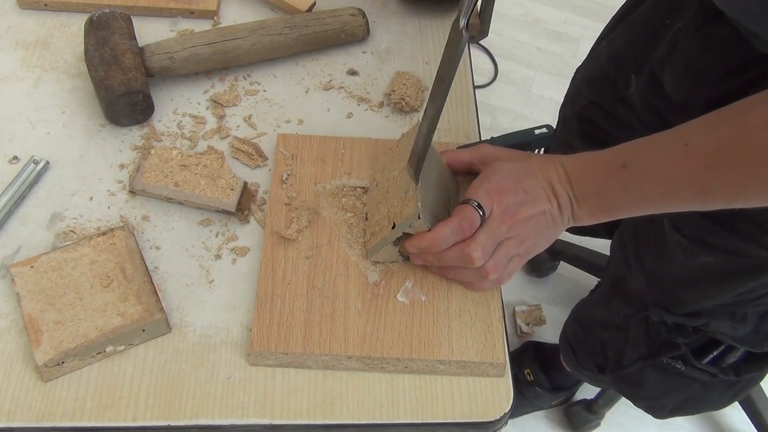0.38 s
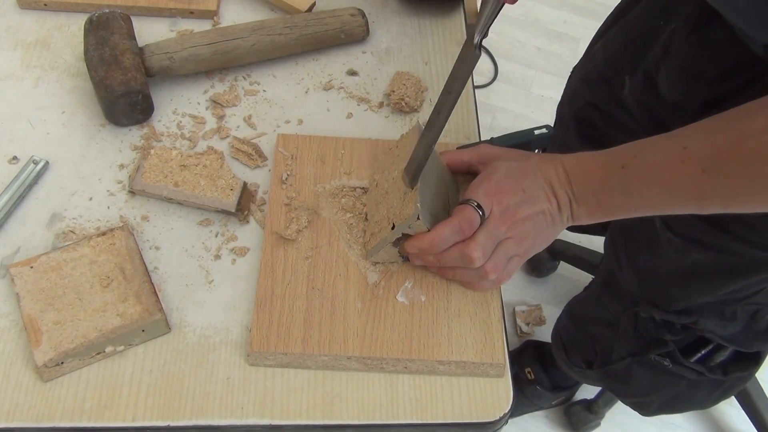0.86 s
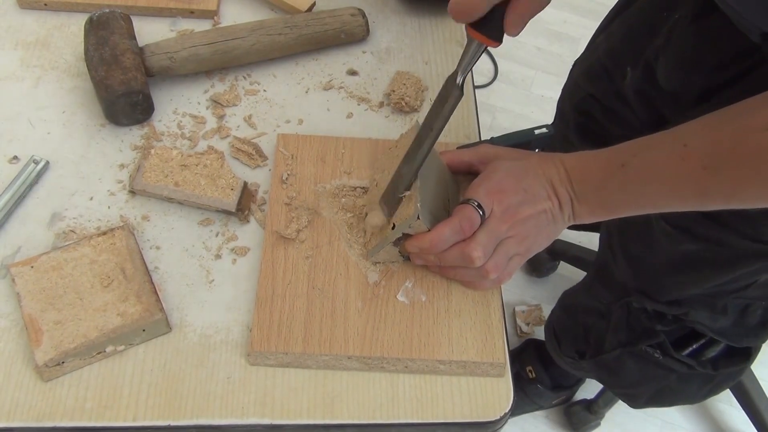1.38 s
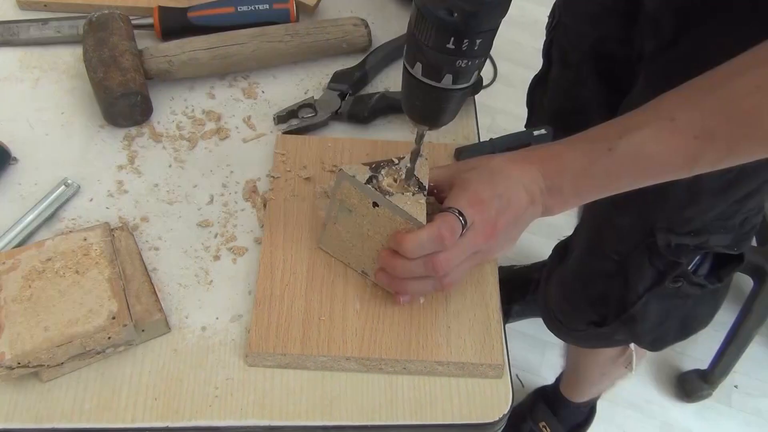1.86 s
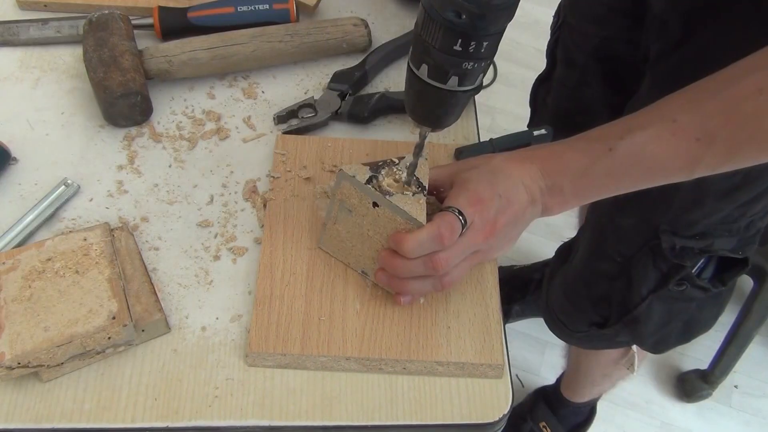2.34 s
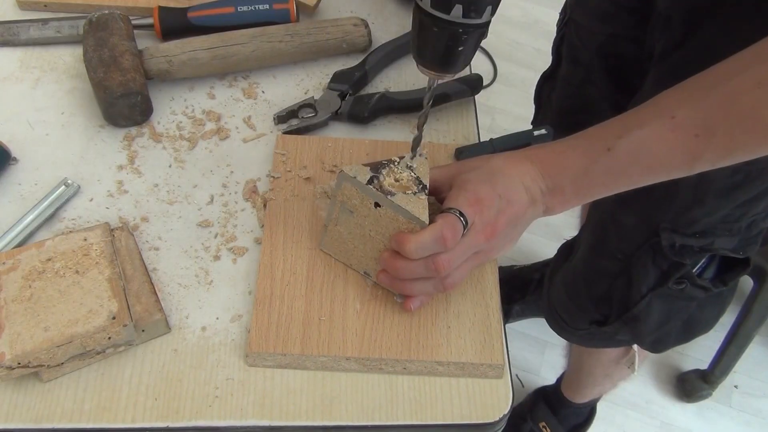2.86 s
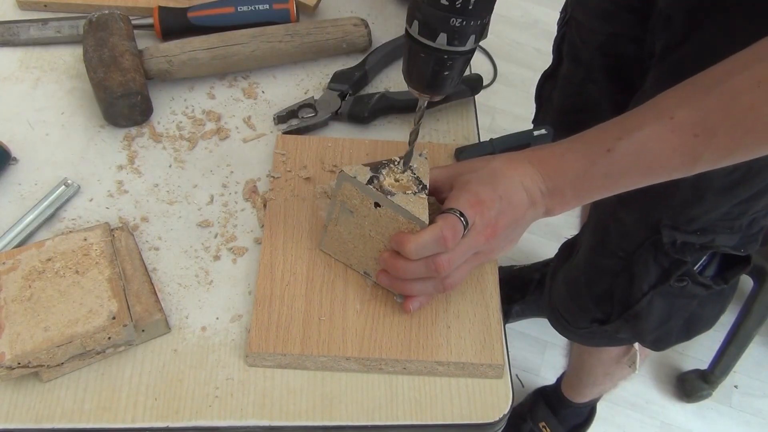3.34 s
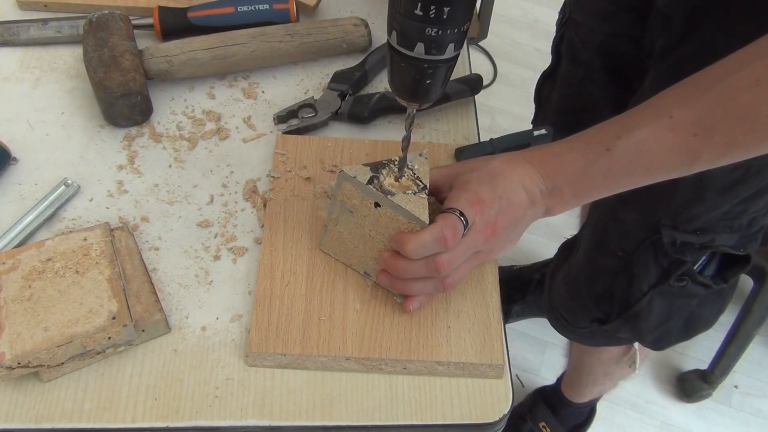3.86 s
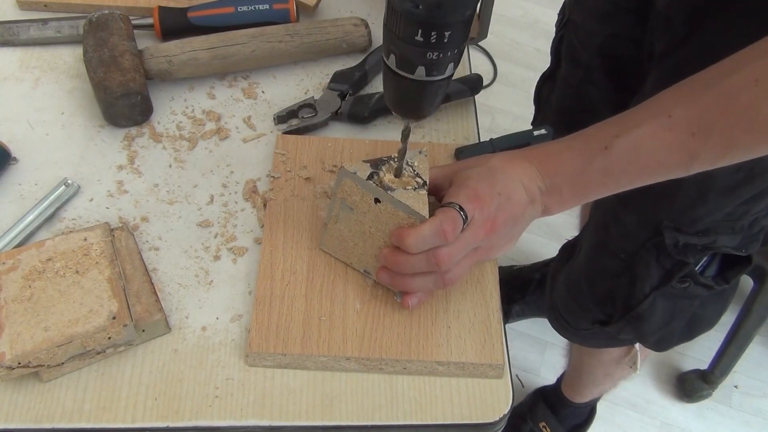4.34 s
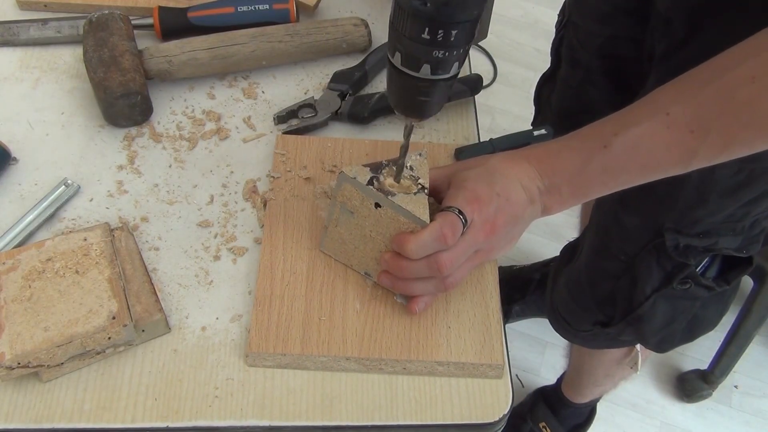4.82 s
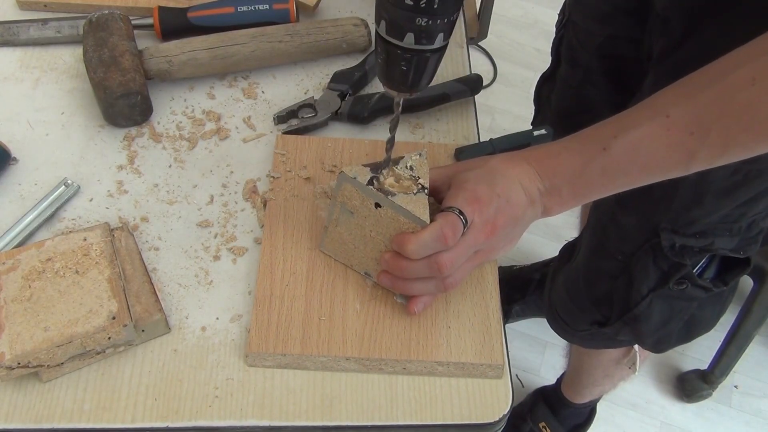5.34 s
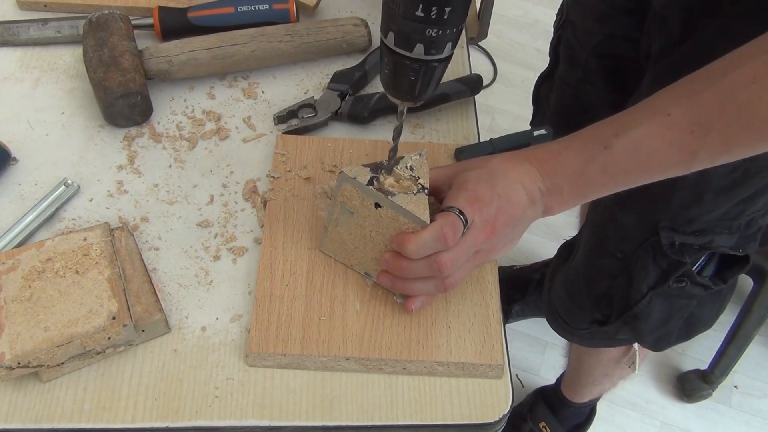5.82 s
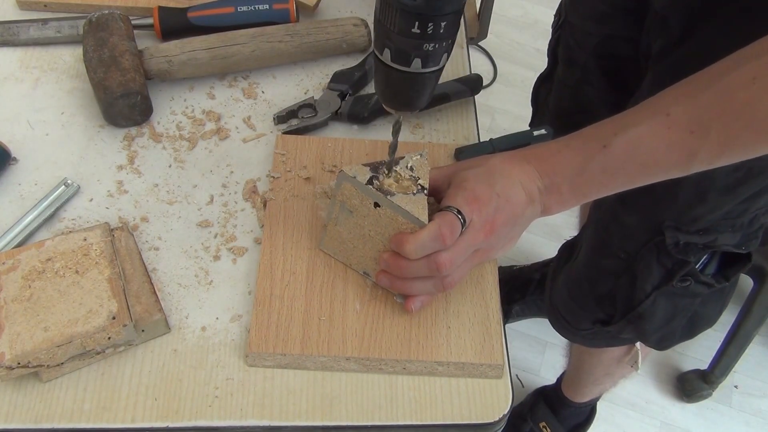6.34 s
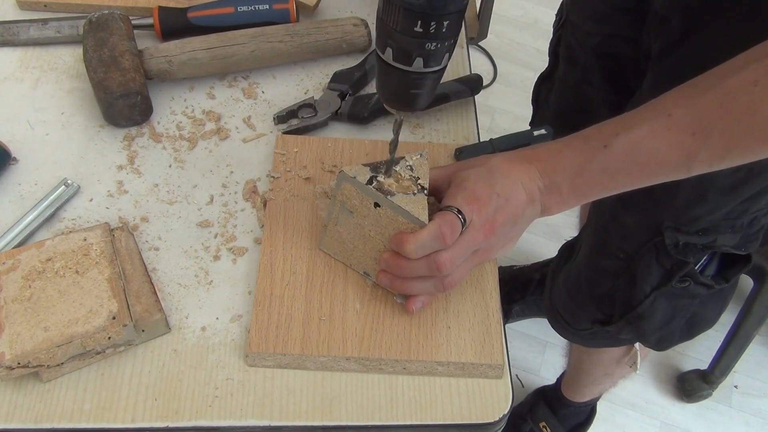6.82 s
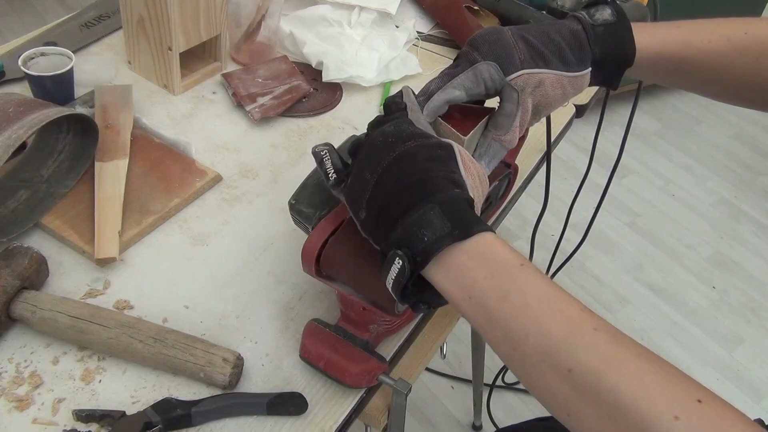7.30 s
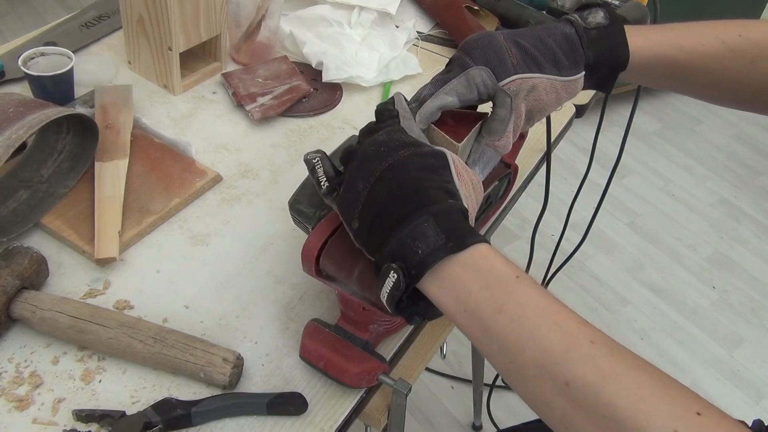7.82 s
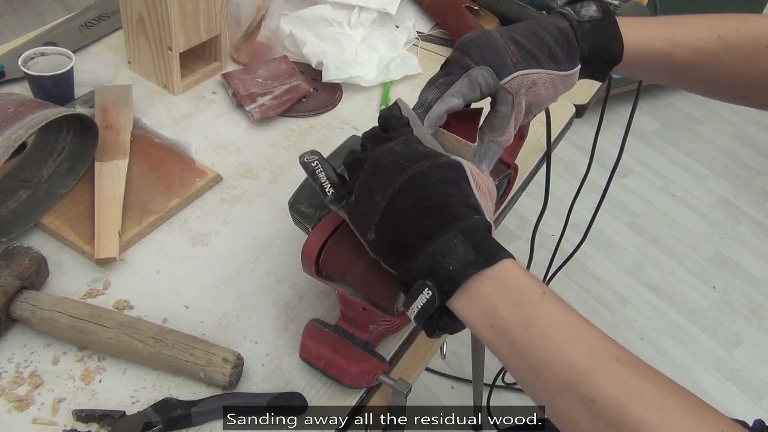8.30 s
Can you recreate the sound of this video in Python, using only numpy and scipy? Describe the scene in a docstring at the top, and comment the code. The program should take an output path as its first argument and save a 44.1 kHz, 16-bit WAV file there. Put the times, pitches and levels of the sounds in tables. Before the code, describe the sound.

A chisel scrapes and snaps wood in short pushes, then a drill roars in three bursts, then a belt sander drones under load.

```python
"""A cordless drill, a chisel and a belt sander heard close by in a small echoing workshop: three scenes with hard cuts.
The drill bores three times: gear roar and armature tones, with clicks from its trigger and brake.
Before it a chisel is pushed down a wooden block: slipping fibres ring bench, block and blade, and wood snaps.
After it a belt sander slows under load: belt roar under tones locked to its motor and pulley.
"""
import sys
import numpy as np
from scipy import signal
from scipy.fft import rfft, irfft, next_fast_len
from scipy.io import wavfile
from scipy.ndimage import map_coordinates

SR = 44100
rng = np.random.default_rng(int(sys.argv[2]) if len(sys.argv) > 2 else 0)


def int16_out(signal):
    """Quantize to a 16-bit WAV file."""
    q = np.round(np.clip(np.atleast_2d(signal).T, -1, 1) * 32767)
    wavfile.write(sys.argv[1], SR, q.astype(np.int16))


def ratio(d):
    """dB to gain"""
    e = np.asarray(d, float) / 20
    return 10 ** e


N = 382788

# resonances of the bench: (pitch [Hz], width [Hz], level [dB])
BENCH_MODES = [(70, 21, -9), (150.3, 32, 2.5), (218, 36, 1), (295, 40, 3), (369, 59, 2), (524, 177, -7.5)]
# resonances of the wooden block: (pitch [Hz], width [Hz], level [dB])
BLOCK_MODES = [(737, 230, 2), (1080, 196, 3), (1410, 333, 1.5), (2040, 370, -3.5), (3000, 1100, -15)]
# hard cuts from chisel to drill and from drill to sander: (time [s], time [s])
CUT_TIMES = (1.806, 6.845)


def unit(x):
    """Scaled to rms 1."""
    return x / np.sqrt(np.mean(x ** 2) + 1e-20)


def along(points, hz):
    """Reads (Hz, value) points on a log frequency axis."""
    f, v = np.transpose(points)
    return np.interp(np.log(hz + 1), np.log(f + 1), v)


def curves(rows):
    """One value per sample for each column after the time."""
    s, *cols = np.transpose(rows)
    return [np.interp(np.arange(N) / SR, s, c) for c in cols]


def between(start, end, fade=0.0012):
    """A gate that is open from start to end."""
    t = np.arange(N) / SR
    return np.clip(np.minimum(t - start, end - t) / fade, 0, 1)


def since(s):
    """Seconds gone since s, zero before."""
    return np.clip(np.arange(N) / SR - s, 0, None)


def ramp(s, length):
    """Climbs from 0 at s to 1 after length."""
    return np.minimum(since(s) / length, 1)


def wobble(rate):
    """A smooth random curve, rate knots a second."""
    knots = rng.standard_normal(int(N * rate / SR) + 4)
    return map_coordinates(knots, [np.arange(N) * rate / SR])


def filtered(x, response):
    """x times a complex response of frequency."""
    m = next_fast_len(N + 8192)
    return irfft(rfft(x, m) * response(np.fft.rfftfreq(m, 1 / SR)), m)[..., :N]


def shaped(x, spectrum):
    """x filtered to a spectrum of (Hz, dB) points."""
    return filtered(x, lambda hz: ratio(along(spectrum, hz)))


def rung(x, modes):
    """x through a set of causal resonances of alternating sign."""
    def response(f):
        return sum((-1) ** k * ratio(db) * 1j * f * w / (c * c - f * f + 1j * f * w)
                   for k, (c, w, db) in enumerate(modes))
    return filtered(x, response)


def grit(spread_db, rate):
    """Noise whose size varies from grain to grain, rate grains a second."""
    return rng.standard_normal(N) * ratio(spread_db * wobble(rate))


def tone(turns, share, waver_db):
    """A sine making share cycles per turn of a shaft, unsteady in level."""
    sine = np.sin(2 * np.pi * (share * turns + rng.random()))
    return np.sqrt(2) * ratio(waver_db * wobble(14)) * sine


def room(x, wet_db):
    """Direct sound plus a noise tail whose decay depends on frequency; a new tail every third of a second."""
    # reverberation: (frequency [Hz], time to fall by 60 dB [s])
    decay = [(100, 0.39), (1000, 0.52), (5000, 0.47), (9000, 0.37), (15000, 0.098)]
    out, step = x.copy(), SR // 3
    for i in range(0, N, step):
        part = x[i:i + step]
        if not part.any():
            continue
        hz, t, z = signal.stft(rng.standard_normal(SR // 2), SR, nperseg=256)
        tail = signal.istft(z * ratio(-60 * t / along(decay, hz)[:, None]), SR, nperseg=256)[1]
        delayed = np.pad(tail, (200, 0)) / np.linalg.norm(tail)  # starts 200 samples late
        wet = signal.fftconvolve(part, delayed)[:N - i]
        out[i:i + len(wet)] += ratio(wet_db) * wet
    return out


def air(before_db, after_db):
    """The quiet of the shop: shaped noise with one level before the first cut and another after it."""
    # spectrum of the quiet: (frequency [Hz], relative level [dB])
    spectrum = [(15, -50), (25, -22.5), (58, -10.5), (163, -6), (245, -10), (634, -13.5), (831, -15),
                (902, -10.5), (1010, -11.5), (2210, -19.5), (2530, -20), (10700, -26), (15200, -31.5),
                (16500, -53.5)]
    first = between(-1, CUT_TIMES[0])
    noise = unit(shaped(grit(spread_db=-1.24, rate=3.9), spectrum))
    return noise * (ratio(before_db) * first + ratio(after_db) * (1 - first))


def stroke(start, end, db, swell_db, hiss_db):
    """Gains of bench, block and blade: the force swells (in the first knock, sinks) until end, then lets go and fades."""
    # after end, for bench, block, blade: (drop [dB], later fade [dB per s])
    settle = [(3, 277.5), (21, 297), (17.5, 202.5)]
    thud_builds_s, let_go_s = 0.013, 0.01  # the bench needs time to get moving
    bend = 1.65  # over 1: quick at first, level near the end
    force_db = db - swell_db * (1 - ramp(start, end - start)) ** bend
    moving = 1 - np.exp(-np.minimum(since(start), end - start) / thud_builds_s)
    gains = []
    for share, (drop_db, fade) in zip([moving, 1, ratio(hiss_db)], settle):
        layer_db = force_db - drop_db * ramp(end, let_go_s) - fade * since(end + let_go_s)
        gains.append(share * ratio(layer_db))
    return ramp(start, .002) * np.array(gains)


def chisel():
    """Fibres tear in quick slips under the edge and shake bench, block and blade together."""
    # pushes, with a short knock first and last:
    # (start [s], end of the push [s], level there [dB], swell until then [dB], blade hiss over the rasp [dB])
    strokes = [(0.2696, .273, -24.5, -3.5, -39), (.40, 0.435, -58.5, 4.5, -14),
               (0.508, .574, -33.5, 27, -5.5), (0.855, 0.938, -28.5, 16.5, -4.5),
               (1.079, 1.186, -50.5, 4, -1), (1.308, 1.432, -24, 15.5, 1), (1.59, 1.595, -36, 0.5, -5)]
    # resonances of the blade: (pitch [Hz], width [Hz], level [dB])
    blade_modes = [(4000, 3300, -2.5), (6800, 680, 9), (8240, 920, 8)]
    splinters_per_s, splinter_db = 130, 23  # single fibres snapping
    slips = grit(spread_db=1.5, rate=350)
    hits = rng.random(N) < splinters_per_s / SR
    splinters = ratio(splinter_db) * hits * rng.uniform(-1.8, 1.6, N)
    knocks = grit(spread_db=2.5, rate=40)
    bench_gain, block_gain, blade_gain = sum(stroke(*row) for row in strokes)
    thud = bench_gain * unit(rung(knocks, BENCH_MODES))
    rasp = block_gain * unit(rung(slips, BLOCK_MODES))
    blade = rung(slips + splinters, blade_modes)
    hiss = blade_gain * unit(rung(blade, [(6640, 14000, 0)]))
    return room(thud + rasp, wet_db=-14) + room(hiss, wet_db=-14.5)


def clicks():
    """Each contact is a short crack around its own pitch and a knock into the block; wood passes it on to the bench."""
    # wood snaps: (time [s], level [dB], pitch [Hz], block knock over the crack [dB], bench knock over it [dB])
    snaps = [(0.27, -33, 4250, 13.5, 10), (0.2775, -27.5, 7600, -4.5, -1.5), (0.41, -39, 2750, 2, -11.5),
             (0.5092, -35.5, 8680, -9, -5.5), (0.5439, -28, 6840, -10, 0), (0.7211, -28.5, 5400, -26, -16),
             (0.73, -34.5, 7490, -13.5, -14.5), (0.8642, -30, 6400, -5, -5), (0.9413, -26, 5770, -13, -3.5),
             (1.1016, -37.5, 8240, -9, -8.5), (1.1919, -15.5, 7940, -31, -33),
             (1.3077, -23, 8630, -19, -19), (1.3151, -23, 8720, -9, -5),
             (1.3428, -11.5, 7710, -14.5, -21.5), (1.4454, -9.5, 3070, -0.5, -23.5),
             (1.4561, -11.5, 8360, -15, -17.5), (1.55, -32.5, 8110, -10.5, -18),
             (1.592, -28, 4460, -10.5, -24.5), (1.728, -44.5, 7800, -12, -16.5),
             (3.0919, -45, 7960, -6, -14), (3.096, -42, 4070, -2, -4), (3.1068, -42, 4060, -17, -2.5),
             (3.4323, -49.5, 3160, -19, -14), (3.478, -24.5, 7560, -28.5, -26.5),
             (4.3615, -22, 3000, 0, -7), (5.5313, -50, 9100, -31, -24)]
    # trigger and brake clicks of the drill: (time [s], level [dB], pitch [Hz])
    switch = [(2.7173, -16, 3880), (2.7256, -16.5, 4360), (4.2019, -34, 6750), (4.2144, -36, 3150),
              (4.2718, -13.5, 5370), (4.2902, -16, 3160), (4.9714, -17, 4580), (4.9796, -16, 4390),
              (5.9612, -32, 7580), (5.9706, -33.5, 3153), (6.0053, -25, 4720), (6.0092, -24, 5370),
              (6.026, -12, 5660)]
    crack_s = .0012  # a crack swells and dies on this time
    switch_knock_db = -21.5  # what a click passes on to the block
    crack, block, bench = np.zeros((3, N))
    t = np.arange(SR // 20) / SR
    band = signal.butter(2, [2200 / (SR / 2), 12000 / (SR / 2)], "band")
    contacts = [(*row, True) for row in snaps]
    contacts += [(*row, switch_knock_db, -np.inf, False) for row in switch]
    for s, db, hz, block_db, bench_db, wood in contacts:
        i = round(s * SR)
        burst = rng.standard_normal(len(t)) * t * np.exp(-t / crack_s)
        bright = signal.lfilter(*band, burst)
        ring = signal.lfilter(*signal.iirpeak(hz, 8 if wood else 4, SR), burst)
        sound = 0.29 * bright + (3.4 if wood else 1.4) * ring  # wood sings more of its own pitch
        crack[i:i + len(t)] += ratio(db - 1.5) * sound / np.abs(sound).max()
        block[i] += ratio(db + block_db)
        bench[i] += ratio(db + bench_db)
    knocks = ratio(28) * rung(block, BLOCK_MODES) + ratio(39) * rung(bench, BENCH_MODES)
    return room(crack, wet_db=-15) + room(knocks, wet_db=-5.0)


def trigger(start, brake, free, spin_s, whine_s):
    """Speed [turns per s] and relative dB of roar, whine and shake: spin-up, sag in the wood, braked run-down."""
    # speed lost to the wood: (time [s], loss [turns per s])
    sag = [(1.81, 3.3), (1.92, 2.4), (2.03, 6.8), (2.2, 3.6), (2.3, 4.2), (2.43, 7.8), (2.474, 10.7),
           (2.6, 0), (6.634, 0), (6.84, 1.9)]
    slow_share, fast_share, fast_over_slow = .32, .35, .38  # missing at the start, made up in two stages
    ease_s, ease_rate, coast_rate = .113, 3900, 950  # let off [s], slowing [turns/s^3], braked [turns/s^2]
    brake_s = .015
    slow_part = slow_share * np.exp(-since(start) / spin_s)
    fast_part = fast_share * np.exp(-since(start) / (fast_over_slow * spin_s))
    eased = since(brake - ease_s)  # the trigger is let off before the brake
    speed = free * (1 - slow_part - fast_part) - curves(sag)[0]
    speed -= ease_rate * np.minimum(eased, ease_s) ** 2 + coast_rate * since(brake)
    roar_db = -11.5 * (1 - ramp(start, .031))  # swells in
    roar_db -= 16 * np.minimum(eased, ease_s)  # sinks once the trigger is let off
    roar_db -= 8.5 * ramp(brake, brake_s) + 160 * since(brake + brake_s)  # drops at the brake, then fades
    # the whine needs power: it starts to fall .03 s after the trigger is let off
    whine_db = -26.5 * np.sqrt(1 - ramp(start, whine_s)) - 300 * since(brake - ease_s + .03)
    shake_db = -97 * eased
    return np.maximum(speed, 0), roar_db, whine_db, shake_db


def drill():
    """Gear roar throbbing once a turn, armature orders on top, and the bit shaking the bench."""
    # pulls of the trigger; the first is under way at its cut, the last is cut off:
    # (start [s], brake [s], free speed [turns per s], spin-up [s], whine comes in over [s])
    pulls = [(1.0, 2.715, 352, .1, .05), (4.296, 4.975, 359.5, .09, .25), (6.035, 7.5, 345.5, .11, .05)]
    # low armature orders: (cycles per turn, relative level in first, second, third run [dB, dB, dB])
    hum = [(1, -60, -62, -61), (3, -51, -50, -50), (4.5, -53, -52, -53), (9, -45, -47, -45),
           (14, -46, -52, -52)]
    # high armature orders: (cycles per turn, relative level in first, second, third run [dB, dB, dB])
    whine = [(15, -47, -49, -53), (18, -47, -46, -45), (19, -39, -42, -44), (21, -39, -34, -36),
             (22, -47, -32, -55), (23, -49, -49, -37), (24, -44, -43, -39), (33, -67, -57, -58),
             (36, -64, -57, -64), (37, -57, -63, -57), (38, -60, -65, -59)]
    # spectrum of the gear roar: (frequency [Hz], relative level [dB])
    gears = [(240, -37), (400, -29.5), (964, -14.5), (1030, -16.5), (1160, -18.5), (1580, -11), (2290, -18),
             (3120, -6), (3580, -10), (3990, -6), (6740, -2.5), (8240, 0), (9470, -11.5), (13300, -18),
             (16000, -29.5)]
    roar_held_db, shake_held_db, coast_s = -27, -56.5, .16
    noisy, tonal = np.zeros((2, N))
    for run, pull in enumerate(pulls):
        start, brake = pull[:2]
        speed, roar_db, whine_db, shake_db = trigger(*pull)
        turns = np.cumsum(speed * (1 + .0007 * wobble(30))) / SR
        throb = 1 + 0.22 * np.cos(2 * np.pi * turns)
        roar = unit(shaped(throb * grit(spread_db=1, rate=400), gears))
        low = np.zeros(N)
        for order, *db in hum:
            power = (speed / speed.max()) ** (order / 4)  # higher orders need speed
            low += ratio(db[run]) * power * tone(turns, order, waver_db=.8)
        high = sum(ratio(db[run]) * tone(turns, order, waver_db=2) for order, *db in whine)
        shake = unit(rung(grit(spread_db=5.5, rate=33), BENCH_MODES))
        # the braked gears rattle the block
        rattle = unit(rung(grit(spread_db=7, rate=60), BLOCK_MODES))
        rattle *= ramp(brake, .015) * ratio(-41 - 70 * since(brake))
        running = between(start, brake + coast_s, fade=0.0066)
        roar *= ratio(roar_held_db + roar_db + .5 * wobble(20))
        noisy += running * (roar + ratio(shake_held_db + shake_db) * shake + rattle)
        # the hum outlasts the roar while coasting
        tonal += running * (ratio(whine_db) * high + ratio(.7 * roar_db) * low)
    return room(noisy, wet_db=-9.5) + room(tonal, wet_db=-14.0)


def sander():
    """Belt roar, the mesh tone of the drive with its half, and side tones from motor and pulley."""
    # slowing under load: (time [s], mesh tone [Hz])
    mesh_pitch = [(6.85, 4070), (7.2, 4055), (7.33, 4035), (7.87, 4003), (8.06, 3992), (8.68, 3922)]
    # the motor makes 10 mesh cycles a turn, the pulley 56: (cycles per mesh cycle, level [dB])
    side_tones = [(15 / 56, -48), (.7, -45), (.8, -48), (55 / 56, -52), (57 / 56, -44), (1.1, -49),
                  (1.2, -46), (1.257, -46), (1.7, -49), (1.8, -47), (109 / 56, -49), (110 / 56, -48),
                  (111 / 56, -49), (113 / 56, -48), (2, -45), (2.2, -49), (2.4, -49), (2.5, -57),
                  (2.7, -61), (3, -63), (3.6, -67)]
    # spectrum of the belt roar: (frequency [Hz], relative level [dB])
    belt = [(35, -69), (60, -43), (437, -13), (540, -10), (882, -7.5), (1060, -2.5), (1780, -6.5),
            (2000, -4.5), (2580, -9), (3580, -7.5), (4030, -6), (5590, -8), (8920, -1), (10800, -14.5),
            (14600, -27), (16000, -33)]
    # the tones waver: (time [s], mesh change [dB], half tone change [dB], upper tone change [dB])
    wavers = [(7.87, -5.5, 2, 0), (8.18, -6.5, -7, 10.5), (8.46, -2.5, 2.5, 5)]
    waver_s, loaded_s = 0.068, 7.37  # half width of a waver; time at which the work is pressed home
    mesh_hz, = curves(mesh_pitch)
    t = np.arange(N) / SR
    early = np.clip(loaded_s - t, 0, 1)  # mesh and half tone grow until then
    bumps = [np.outer(db, np.exp(-((t - s) / waver_s) ** 2)) for s, *db in wavers]
    mesh_db, half_db, upper_db = sum(bumps)
    turns = np.cumsum(mesh_hz * (1 + 0.000484 * wobble(20))) / SR  # in mesh cycles
    roar = unit(shaped(grit(spread_db=1.0, rate=300), belt))
    roar *= ratio(-28 + 0.23 * wobble(14))
    sides = sum(ratio(db) * tone(turns, share, waver_db=2.5) for share, db in side_tones)
    mesh = ratio(-30 + mesh_db - 36 * early) * tone(turns, 1, waver_db=2)
    half = ratio(-36.5 + half_db - 22 * early) * tone(turns, .5, waver_db=1.0)
    # one pulley turn under and over the half tone; the lower one fades
    lower = ratio(-34 - 5.5 * since(CUT_TIMES[1])) * tone(turns, 27 / 56, waver_db=1.2)
    upper = ratio(-46 + upper_db) * tone(turns, 29 / 56, waver_db=1.2)
    return roar + mesh + half + lower + upper + sides


def squeezed(x, top):
    """Peaks rounded off toward a ceiling."""
    return x / (1 + np.abs(x / top) ** 4) ** (1 / 4)


def scene():
    """Chisel, drill and sander in turn; the two close microphone ports differ mostly by a phase that wanders
    with frequency, with a weaker share of diffuse sound."""
    # quiet of the shop: (level before the first cut [dB], level after it [dB])
    air_db = [-55.5, -66]
    # difference of the ports against their sum: (frequency [Hz], gain [dB])
    apart = [(60, -9.5), (200, -18), (700, -21), (1300, -23.5), (2400, -19.5), (4400, -22), (7000, -15),
             (9000, -21.5), (15000, -41.5)]
    # while drilling, the sound is nearly mono from 1.4 to 3.2 kHz: (frequency [Hz], change of that difference [dB])
    drill_side_change = [(200, 4.5), (900, -3.5), (1400, -22), (3200, -22), (4200, -2)]
    first = between(-1, CUT_TIMES[0], fade=.0005)
    last = between(CUT_TIMES[1], 99)
    drilling = (1 - first) * (1 - last)
    contacts = clicks()
    # the cuts also end the tails in the sum
    mid = first * (chisel() + contacts) + last * sander()
    mid += drilling * squeezed(drill() + contacts, top=0.15)
    scatter = np.exp(2j * np.pi * 0.45 * wobble(12))  # a phase that wanders with frequency
    diffuse = sum(room(part * mid, wet_db=-10) - part * mid for part in (first, 1 - first))
    side = filtered(ratio(-1) * mid, lambda hz: np.resize(scatter, len(hz))) + diffuse
    side = (1 - drilling) * side + drilling * shaped(side, drill_side_change)
    side = shaped(side + air(-49.5, -57.5), apart)
    # the sander shakes the stand under the ports
    side += last * ratio(-68.5) * unit(rung(rng.standard_normal(N), [(110, 110, 0)]))
    mid += air(*air_db)
    return np.array([mid + side, mid - side])


def low_pass(x):
    """Removes everything above the highest recorded frequency."""
    return signal.sosfilt(signal.butter(12, 16790, fs=SR, output="sos"), x)


def record(dry):
    """The recorder keeps nothing above its band limit."""
    top_hz = 15900
    limited = filtered(dry, lambda hz: hz < top_hz)
    return low_pass(limited)


dry = scene()
out = record(dry)
int16_out(out)
```